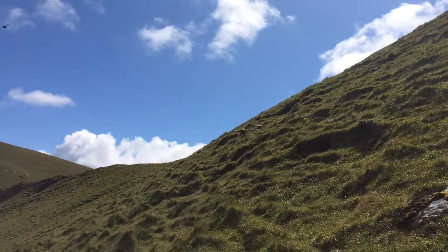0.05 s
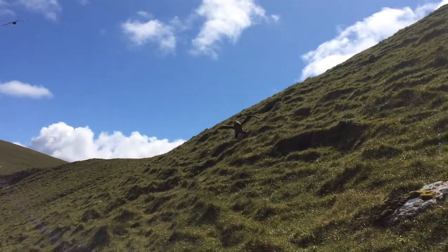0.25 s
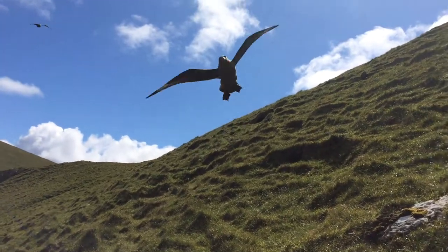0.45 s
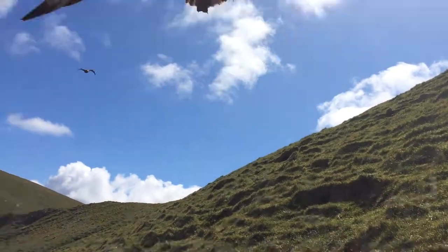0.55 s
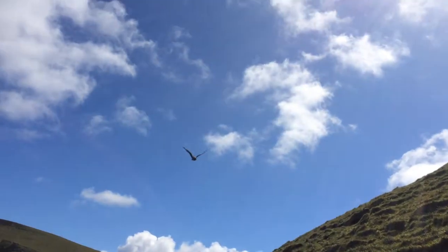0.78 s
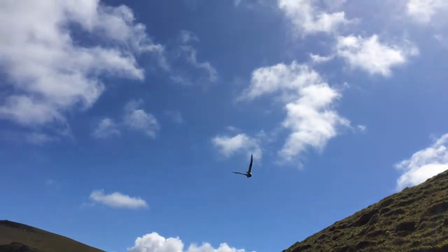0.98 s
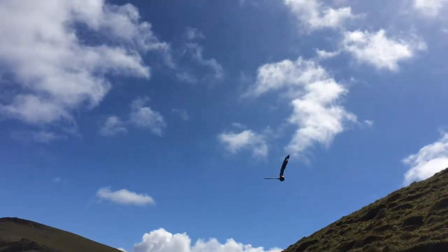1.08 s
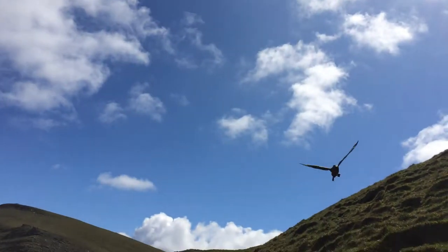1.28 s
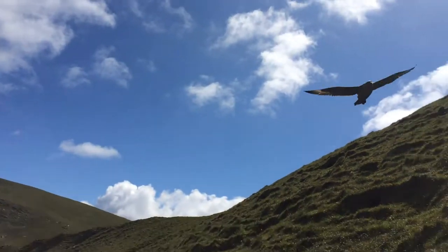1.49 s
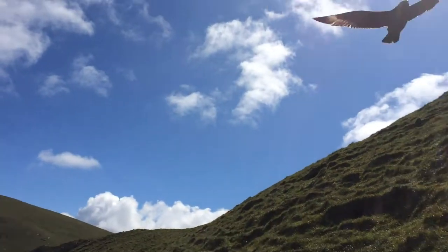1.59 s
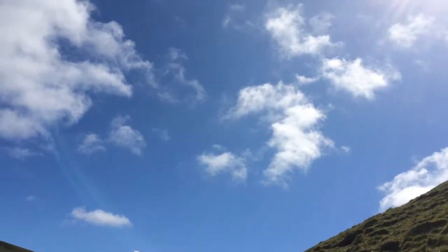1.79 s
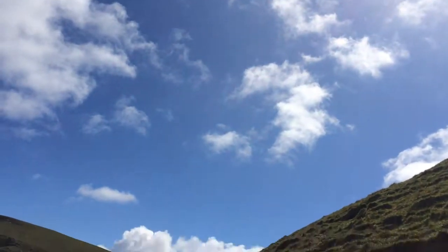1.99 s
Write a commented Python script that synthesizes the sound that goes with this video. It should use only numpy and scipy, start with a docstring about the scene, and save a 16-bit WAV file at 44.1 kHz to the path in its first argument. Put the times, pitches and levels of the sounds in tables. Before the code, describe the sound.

A large bird swoops past on an open hillside. Soft swishes near 0.4 seconds lead into a whoosh of air over its wings, peaking around 0.7 seconds with faint feather whistles, then quickly dropping away. Wind rumbles and thumps on the microphone throughout, hardest around 1.4 seconds, over a faint, growing grass hiss. Soft swishes return near 1.3 and 1.75 seconds, with two tiny ticks near 1.6.

```python
"""A large bird dives past on an open hillside. From the start, wind rumbles on the microphone and
its eddies strike it in short buffets, over a faint hiss of grass that slowly grows. Soft swishes
come near 0.4 s; then air tearing over the wings swells to a whoosh at 0.7 s, with whistles off the
feather edges, dulls and drops away. Swishes return from 1.3 s, and two tiny ticks fall near 1.6 s."""
import sys
import numpy as np
from scipy import signal
from scipy.fft import rfft, irfft
from scipy.io import wavfile
from scipy.ndimage import uniform_filter1d

SR = 44100
rng = np.random.default_rng(int(sys.argv[2]) if len(sys.argv) > 2 else 0)


def transcribe(u):
    """Save the signal u as a 16-bit wav file named by the first command-line argument.

    u: samples, shape (n,) or (channels, n), limited to [-1, 1]; the rate is SR.
    q: integer samples, one column per channel.
    """
    v = np.clip(np.atleast_2d(u).T, -1, 1)
    q = np.round(v * 32767).astype(np.int16)
    wavfile.write(sys.argv[1], SR, q)


N = 90404
T = np.arange(N) / SR


def from_db(db):
    """Decibels to gain."""
    return 10 ** (np.asarray(db) / 20)


def unit_rms(x):
    """Scale to unit power."""
    return x / np.sqrt(np.mean(x ** 2) + 1e-20)


def envelope(points):
    """Gain through (time_s, level_db) points."""
    return from_db(np.interp(T, *np.transpose(points)))


def noise(spectrum):
    """Unit-power noise shaped by (freq_hz, density_db) points."""
    freq_hz, density_db = np.transpose(spectrum)
    bins_hz = np.maximum(np.fft.rfftfreq(N, 1 / SR), 1)
    gain = from_db(np.interp(np.log(bins_hz), np.log(freq_hz), density_db)) * (bins_hz > 10)
    return unit_rms(irfft(rfft(rng.standard_normal(N)) * gain, N))


def butter(x, edge_hz, kind, order):
    """Butterworth low- or high-pass."""
    return signal.sosfilt(signal.butter(order, edge_hz, kind, fs=SR, output="sos"), x)


def zero_phase_lowpass(x, edge_hz, order):
    """Butterworth low-pass, run forward and back."""
    return signal.sosfiltfilt(signal.butter(order, edge_hz, fs=SR, output="sos"), x)


def steady(x, window_s=0.018):
    """Turbulence of even strength: noise divided by its smoothed envelope."""
    size = int(window_s * SR)
    power = np.abs(signal.hilbert(x)) ** 2
    smoothed = uniform_filter1d(uniform_filter1d(power, size), size)
    return unit_rms(x / np.sqrt(smoothed + 1e-9))


def swell(peak_s, rise_s, fall_s):
    """Rounded peak with exponential flanks."""
    flank_s = np.where(T < peak_s, rise_s, fall_s)
    return 1 / np.cosh(np.clip((T - peak_s) / flank_s, -30, 30))


def bell(peak_s, sigma_s):
    """Gaussian envelope."""
    return np.exp(-.5 * ((T - peak_s) / sigma_s) ** 2)


# Grass hiss: time_s, level_db
GRASS_LEVEL = [(.1, -74.5), (.95, -66.5), (1.2, -63), (1.5, -60.5), (1.63, -64.5), (1.86, -61.5),
               (1.97, -60)]
# Grass spectrum: freq_hz, density_db
GRASS_SPECTRUM = [(100, 8), (500, 4.5), (1000, -2.5), (2000, -8), (4000, -15.5), (8000, -19.5),
                  (15000, -24.5)]


def grass_hiss():
    """Distant wind hisses faintly in the grass."""
    return envelope(GRASS_LEVEL) * noise(GRASS_SPECTRUM)


# Ticks: start_s, level_db
TICKS = [(1.5625, -52), (1.5866, -54.5)]
# Tick spectrum: freq_hz, density_db
TICK_SPECTRUM = [(1000, -9), (2000, -3), (3500, 1), (5500, 0), (8000, -10), (15000, -12)]


def ticks(decay_s=0.0014):
    """Tiny dry clicks close to the microphone."""
    gain = np.zeros(N)
    for start_s, level_db in TICKS:
        gain += from_db(level_db) * (T >= start_s) * np.exp(-np.abs(T - start_s) / decay_s)
    return gain * noise(TICK_SPECTRUM)


# Wind between buffets: time_s, level_db
RUMBLE_LEVEL = [(.025, -26), (.06, -50), (.135, -49), (.18, -33.5), (.29, -40), (.33, -44.5), (.39, -33),
                (.46, -37), (.54, -29.5), (.66, -34.5), (.77, -35.5), (.85, -36), (.92, -26.5), (.97, -36),
                (1.06, -28.5), (1.11, -39), (1.17, -40), (1.29, -30), (1.46, -27.5), (1.51, -37.5),
                (1.6, -40.5), (1.71, -39), (1.75, -48.5), (1.805, -45.5), (1.84, -36), (1.895, -44),
                (1.95, -40.5), (1.99, -40)]
# Rumble spectrum: freq_hz, density_db
RUMBLE_SPECTRUM = [(20, -17), (35, -12.5), (60, 10.5), (95, 0.5), (135, 1), (200, -10.5), (300, -24),
                   (450, -30), (650, -51), (1000, -61), (2000, -89.5)]


def wind_rumble(flutter_db=2, flutter_hz=21.7):
    """Low, lumpy turbulence on the microphone follows the gusts."""
    flutter = unit_rms(butter(rng.standard_normal(N), flutter_hz, "low", order=2))
    return envelope(RUMBLE_LEVEL) * from_db(flutter_db * flutter) * steady(noise(RUMBLE_SPECTRUM))


# Eddies: peak_s, thump_db, thump_sigma_s, flap_db, flap_flank_s, flap_edge_hz
EDDIES = [(0.093, -31.5, 0.015, -48.5, 0.0057, 520), (.251, -22, 0.011, -44, 0.0056, 420),
          (0.376, -19.5, 0.0065, -40.5, .007, 450), (0.415, -18, .014, -33.5, 0.0068, 500),
          (0.488, -14, 0.0058, -22, 0.0047, 650), (0.511, -23, 0.0029, -27.5, 0.0055, 350),
          (.541, -25, 0.007, -40.5, 0.0045, 374), (0.582, -22, 0.0083, -48, .008, 350),
          (0.631, -28.5, 0.0091, -38, 0.0039, 480), (0.664, -29, 0.0062, -39, 0.0043, 300),
          (0.717, -16, 0.0019, -32.5, 0.0031, 400), (0.868, -31, 0.009, -52, .004, 295),
          (0.897, -21.5, 0.0034, -24, 0.00093, 570), (0.923, -26, 0.015, -48, 0.025, 450),
          (.953, -40, 0.0089, -40, 0.0027, 500), (.997, -24, 0.0079, -40, 0.0046, 420),
          (1.034, -25, 0.0088, -45, 0.0097, 400), (1.076, -24.5, .01, -43, 0.013, 410),
          (1.137, -36.5, 0.0054, -42.5, 0.0075, 396), (1.15, -33, 0.0056, -45.5, 0.0026, 380),
          (1.254, -29.5, 0.0061, -27, 0.0024, 480), (1.31, -32, 0.0031, -39.5, 0.0034, 600),
          (1.322, -22.5, 0.0026, -47, 0.0026, 350), (1.358, -7.5, 0.0055, -21.5, 0.006, 614),
          (1.394, -12, 0.0045, -32.5, 0.013, 550), (1.422, -31, 0.0057, -30.5, 0.0015, 707),
          (1.427, -14, 0.0048, -31, 0.0064, 545), (1.446, -21.5, 0.0022, -17.5, 0.0025, 800),
          (1.468, -21, 0.0051, -32.5, 0.0074, 600), (1.547, -27, 0.0045, -26, 0.0021, 530),
          (1.595, -36.5, 0.0074, -53, 0.0074, 560), (1.621, -32.5, 0.0062, -55, 0.0066, 380),
          (1.686, -36, 0.011, -44.5, 0.0024, 380), (1.917, -34, 0.0061, -56, 0.0034, 297),
          (1.968, -31.5, 0.0066, -51.5, 0.006, 400)]
# Thump spectrum: freq_hz, density_db
THUMP_SPECTRUM = [(25, -30), (55, -10.5), (95, 12), (145, -0.5), (220, -8), (350, -24), (700, -78.5)]


def wind_buffets():
    """Each eddy strikes the microphone with a low thump and a brief flap that reaches higher."""
    thump_gain = sum(from_db(db) * bell(peak_s, sigma_s) for peak_s, db, sigma_s, *_ in EDDIES)
    thumps = thump_gain * steady(noise(THUMP_SPECTRUM))
    turbulence = butter(rng.standard_normal(N), edge_hz=167, kind="high", order=3)
    turbulence = butter(turbulence, edge_hz=363, kind="low", order=1)
    flaps = np.zeros(N)
    for peak_s, _, _, flap_db, flank_s, edge_hz in EDDIES:
        span = np.abs(T - peak_s) < .1
        flap = steady(butter(turbulence[span], edge_hz, "low", order=4))
        flaps[span] += from_db(flap_db) * swell(peak_s, flank_s, flank_s)[span] * flap
    return thumps + zero_phase_lowpass(flaps, edge_hz=1396, order=2)


# Swishes: peak_s, level_db, rise_s, fall_s, treble_db
SWISHES = [(.368, -52.5, 0.024, 0.065, -5.5), (0.469, -51.5, 0.021, 0.012, -1),
           (1.27, -56, 0.0095, 0.013, 1), (1.3, -57.5, 0.027, 0.024, 0.5),
           (1.751, -56.5, 0.031, 0.064, 0.5), (1.81, -68, 0.028, 0.1, 1.5),
           (1.903, -68, .009, 0.0066, 13.5)]
# Swish spectrum: freq_hz, density_db
SWISH_SPECTRUM = [(200, -5.5), (500, 5), (700, -7.5), (900, 1), (1350, -6), (2400, -8.5), (4200, -13.5),
                  (7000, -18), (11000, -20), (15000, -24)]


def swishes():
    """Soft rushes of air, each with its own brightness."""
    air = noise(SWISH_SPECTRUM)
    body = zero_phase_lowpass(air, edge_hz=4000, order=1)
    body_power, treble_power = np.zeros((2, N))
    for peak_s, level_db, rise_s, fall_s, treble_db in SWISHES:
        power = (from_db(level_db) * swell(peak_s, rise_s, fall_s)) ** 2
        body_power += power
        treble_power += power * from_db(treble_db) ** 2
    return body * np.sqrt(body_power) + (air - body) * np.sqrt(treble_power)


# Whistles: peak_s, sigma_s, pitch_hz, glide_hz_per_s, level_db
WHISTLES = [(0.555, 0.0075, 850, -3000, -52.5), (0.583, 0.0062, 3170, 304, -57.5),
            (0.652, 0.028, 3255, 298, -59.5), (0.69, 0.01, 7960, 1006, -60),
            (0.741, 0.024, 998, -1000, -46), (0.761, 0.011, 5450, -2000, -50.5),
            (.792, 0.0083, 6100, 12000, -56), (1.28, 0.013, 884, 2999, -60.5),
            (1.738, 0.012, 930, 5000, -56)]


def feather_whistles(bandwidth_hz=370):
    """Feather edges cut the air and shed narrow, gliding bands of noise."""
    out = np.zeros(N)
    for peak_s, sigma_s, pitch_hz, glide_hz_per_s, level_db in WHISTLES:
        white = rng.standard_normal(N) + 1j * rng.standard_normal(N)
        waver = butter(white, bandwidth_hz / 2, "low", order=2)
        offset_s = T - peak_s
        phase = 2 * np.pi * (pitch_hz * offset_s + .5 * glide_hz_per_s * offset_s ** 2)
        band = unit_rms(np.real(waver * np.exp(1j * phase)))
        out += from_db(level_db) * bell(peak_s, sigma_s) * band
    return out


# Air over the wings: time_s, level_db
DIVE_LEVEL = [(.1, -74), (.3, -63), (.52, -59), (.6, -54.5), (.66, -51), (.71, -38.5), (.745, -40.5),
              (.795, -44), (.82, -55), (.845, -66.5), (.9, -79.5)]
# Wing spectrum: freq_hz, density_db
WING_SPECTRUM = [(150, -29), (400, -1.5), (560, 5), (740, -1.5), (1000, 2), (1400, -3.5), (2000, -4),
                 (3100, -7), (4300, -10), (5800, -11.5), (9000, -15), (15000, -22)]


def bird_dive(closest_s=0.745, near_db=4, dull_db_per_s=200, dull_max_db=8):
    """Air tearing over the wings swells and brightens as the bird nears, and dulls as it leaves."""
    air = noise(WING_SPECTRUM)
    body = zero_phase_lowpass(air, edge_hz=10700, order=3)
    lift_db = near_db * bell(closest_s, sigma_s=0.026)
    dull_db = np.clip(dull_db_per_s * (T - closest_s), 0, dull_max_db)
    treble = (air - body) * from_db(lift_db - dull_db)
    return envelope(DIVE_LEVEL) * (body + treble)


def scene():
    """Bird and wind in the open; mono, no echo."""
    foreground = bird_dive() + feather_whistles() + swishes()
    return (foreground + wind_rumble() + wind_buffets() + grass_hiss() + ticks())[None]


def record(dry):
    """The microphone sheds the deepest bass; the top is cut steeply."""
    bass_hz, top_hz = 35, 15350
    lean = butter(dry, bass_hz, "high", order=2)
    return signal.sosfilt(signal.ellip(12, .1, 80, top_hz, fs=SR, output="sos"), lean)


dry = scene()
out = record(dry)
transcribe(out)
```